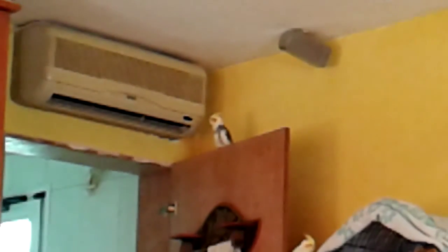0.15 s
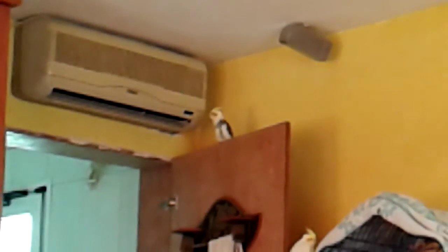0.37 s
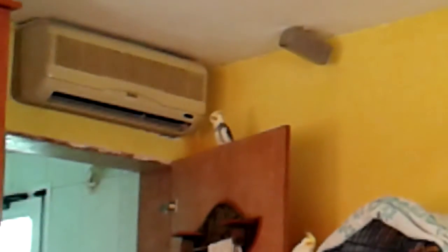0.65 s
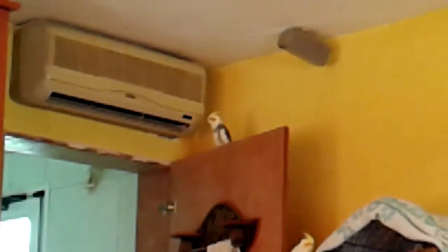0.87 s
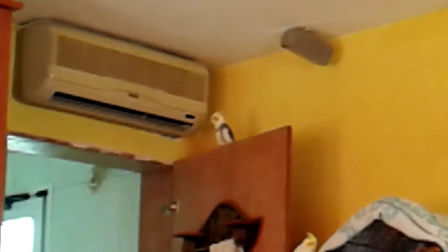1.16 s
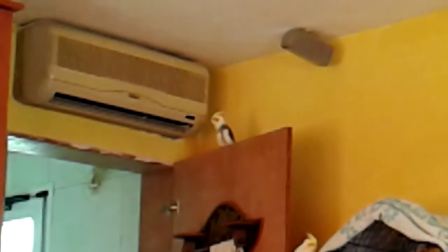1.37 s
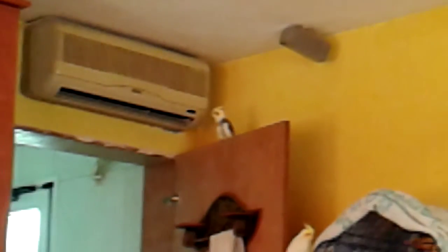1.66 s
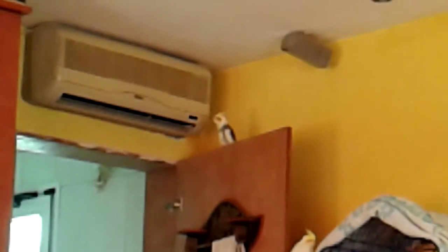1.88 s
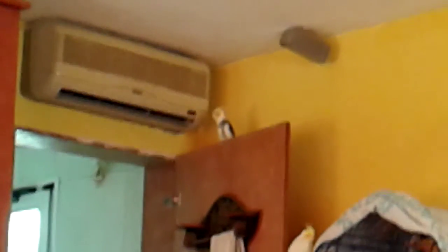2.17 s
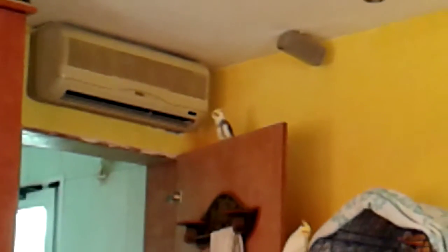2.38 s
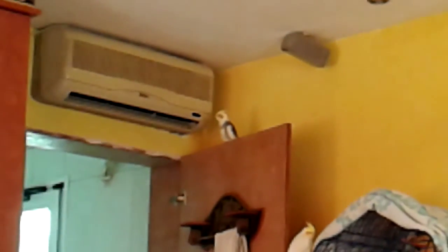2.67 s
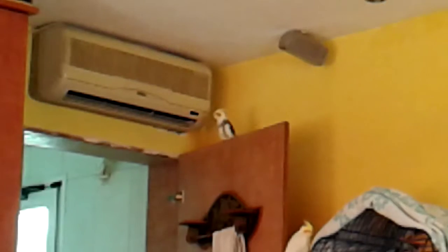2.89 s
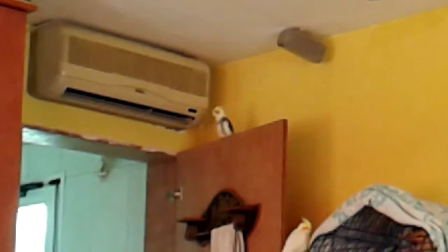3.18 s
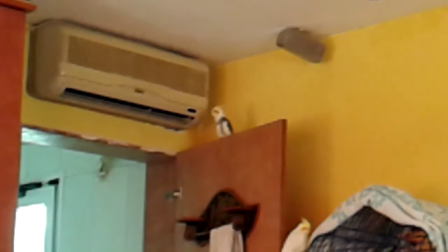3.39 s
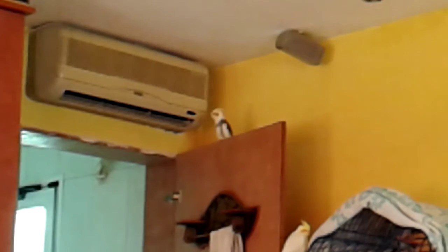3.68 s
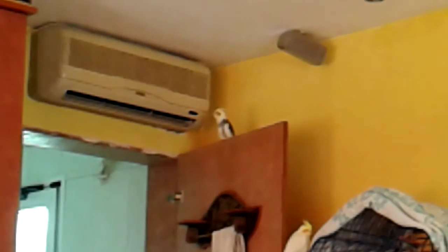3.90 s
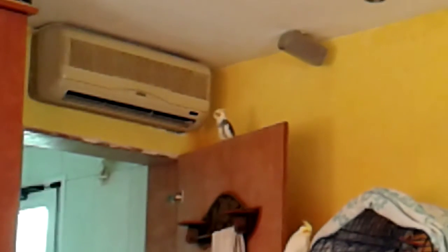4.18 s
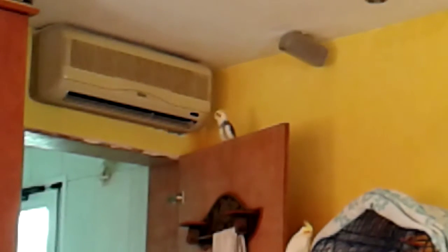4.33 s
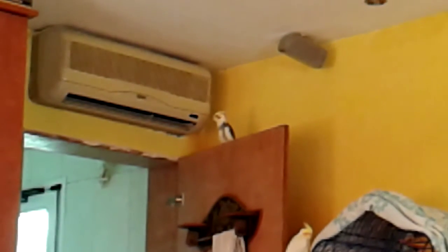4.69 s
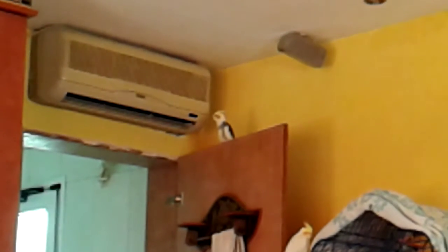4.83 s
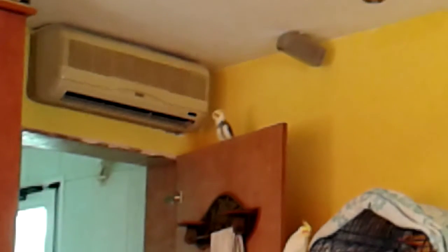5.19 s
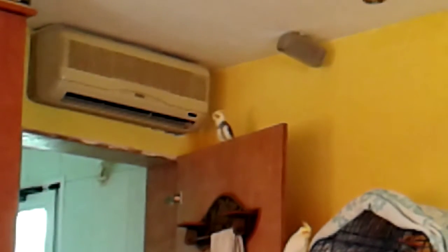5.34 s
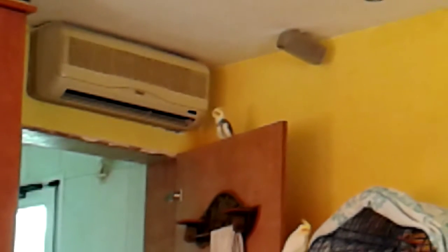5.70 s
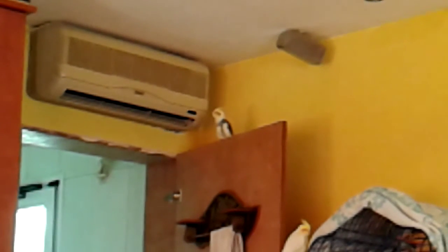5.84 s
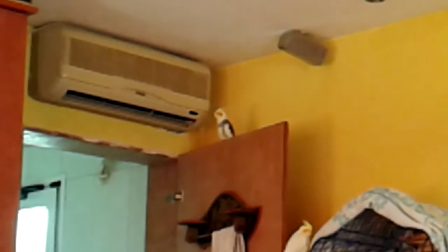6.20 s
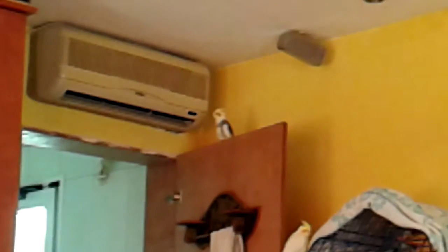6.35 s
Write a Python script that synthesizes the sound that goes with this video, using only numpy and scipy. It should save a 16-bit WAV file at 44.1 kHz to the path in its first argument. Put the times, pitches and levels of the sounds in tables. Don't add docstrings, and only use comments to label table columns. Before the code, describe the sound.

Mono phone pickup in a hard-walled room, cockatiels a few metres away, each note trailed by a short bright reverberation. Near silence first, then at 0.2-0.5 s a scoop rises to a clear whistle near 2.8 kHz and falls. Further scooped calls come at 0.75-1.0, 1.3-1.55 and 1.8 s. The loudest, brightest calls, with squawky onsets, come at 2.1, 2.4-2.6 (peak, ending in a steep fall) and 2.8 s. A weak note at 3.1 and a clear whistle at 3.4 follow. From 3.9 to 4.9 s only low, hoarse, quieter mutters. Softer whistles return at 5.25 and 5.8, with a mutter at 5.6, then thin chirps at 6.1 and 6.45. Hiss and low rumble swell with calls and shrink between. Very faint dog yaps throughout, engine drone around 1-3 s, a thin brake squeal near 3.3; tiny case ticks at 0.7, 1.05, 1.6, 2.35, with dull taps until 2.5.

```python
import sys
import numpy as np
from scipy import signal
from scipy.fft import rfft, irfft, next_fast_len
from scipy.io import wavfile
from scipy.ndimage import uniform_filter1d, map_coordinates

SR = 44100
rng = np.random.default_rng(int(sys.argv[2]) if len(sys.argv) > 2 else 0)


def to_linear_factor(level_db):
    exponent = np.asarray(level_db, float) / 20
    return 10 ** exponent


def store_wav(level_fs):
    pcm = np.round(np.clip(np.atleast_2d(level_fs), -1, 1) * 32767)
    wavfile.write(sys.argv[1], SR, pcm.T.astype(np.int16))


N = 287532
T = np.arange(N) / SR


def unit(x):
    return x / np.sqrt(np.mean(x ** 2) + 1e-20)


def along(points, hz):
    point_hz, value = np.transpose(points)
    return np.interp(np.log(hz + 1), np.log(point_hz + 1), value)


def curve(rows):
    return np.interp(T, *np.transpose(rows))


def wobble(rate, size=N):
    knots = rng.standard_normal(int(size * rate / SR) + 4)
    return map_coordinates(knots, [np.arange(size) * rate / SR])


def filtered(x, response):
    m = next_fast_len(N + SR // 2)
    return irfft(rfft(x, m) * response(np.fft.rfftfreq(m, 1 / SR)), m)[:N]


def span(rows, edge):
    s, *cols = np.transpose(rows)
    at = slice(round(s[0] * SR), min(N, round(s[-1] * SR)))
    window = np.clip(np.minimum(T[at] - s[0], s[-1] - T[at]) / edge, 0, 1)
    return at, [np.interp(T[at], s, c) for c in cols], window


# start_s, widest_s, hiss_let_through_db
OPENINGS = [(0.165, 0.52, -61.5), (0.735, 1.056, -63), (1.231, 1.636, -64), (1.803, 1.902, -61.5),
            (2.07, 2.333, -60.5), (2.4, 2.634, -61), (2.755, 2.983, -63), (3.065, 3.201, -64),
            (3.399, 3.613, -63.5), (3.924, 3.989, -67), (4.104, 4.211, -65), (4.28, 4.403, -66.5),
            (4.593, 4.718, -68.5), (4.741, 4.857, -66), (5.116, 5.394, -65), (5.54, 5.867, -63.5),
            (6.09, 6.163, -62.5), (6.412, 6.533, -65)]


def opening():
    shut_db, closing_db_per_s = -74, 38.5
    early_share = 0.51
    points = [(0, shut_db)]
    for start, widest, db in OPENINGS:
        last_s, last_db = points[-1]
        shut = min(last_s + (last_db - shut_db) / closing_db_per_s, start - .001)
        from_db = last_db - closing_db_per_s * (shut - last_s)
        early = (start + (widest - start) / 3, from_db + early_share * (db - from_db))
        points += [(shut, from_db), (start, from_db), early, (widest, db)]
    return to_linear_factor(curve(points) + 64)


# pitch_hz, t60_s
ROOM_DECAY = [(500, 0.29), (1500, 0.44), (2700, 0.28), (5000, 0.38), (9000, 0.14)]


def room(x, onset):
    hz, t, z = signal.stft(rng.standard_normal(SR * 3 // 4), SR, nperseg=256)
    decay = to_linear_factor(-60 * t / along(ROOM_DECAY, hz)[:, None])
    tail = signal.istft(z * decay, SR, nperseg=256)[1]
    tail = tail * (1 - np.exp(-np.arange(len(tail)) / SR / onset))
    return signal.fftconvolve(x, tail / np.linalg.norm(tail))


# frequency_hz, level_db_per_hz
AIR_SPECTRUM = [(12, -34), (20, -2), (54, 2.5), (205, -2.5), (302, -10.5), (433, -17), (587, -18.5),
                (693, -20), (774, -19), (1110, -24.5), (1550, -24), (2280, -22), (2480, -25.5),
                (2770, -24.5), (15000, -29.5)]
# time_s, level_db
RUMBLE_SWELL = [(0, -2.5), (1.7, 5), (1.9, 9), (2.5, 0), (3.5, 3.5), (4, -3.5), (4.7, 4), (5.4, 8),
                (5.9, 2.5), (6.52, 5)]


def air():
    bed = unit(filtered(rng.standard_normal(N), lambda hz: to_linear_factor(along(AIR_SPECTRUM, hz))))
    low = filtered(bed, lambda hz: 1 / (1 + (hz / 330) ** 4))
    swell_db = curve(RUMBLE_SWELL) - 12 + 1.7 * wobble(10)
    return to_linear_factor(-49) * (bed - low + low * to_linear_factor(swell_db))


def far_notes(rows, fall, shake):
    out = np.zeros(N)
    for start, length, hz, db in rows:
        u = np.arange(round(length * SR)) / SR / length
        pitch = hz * (1 + fall * (.5 - u) + shake * wobble(31, size=SR)[:len(u)])
        tone = np.sin(2 * np.pi * np.cumsum(pitch) / SR)
        out[round(start * SR):][:len(u)] += to_linear_factor(db + 4) * np.sin(np.pi * u) ** 0.65 * tone
    return out


# start_s, length_s, pitch_hz, level_db
ENGINE = [
    (1.048, .62, 68.7, -55.5),
    (1.818, 0.32, 71.85, -56.5),
    (2.172, .78, 69.5, -57.5),
    (5.06, 0.26, 70.9, -75),
]


def engine():
    out = np.zeros(N)
    for start, length, pitch, level in ENGINE:
        at, (hz, db), window = span([(start, pitch, level), (start + length, pitch, level)], edge=0.074)
        hz = hz * (1 + .015 * wobble(4, size=SR)[:len(hz)])
        out[at] += to_linear_factor(db - 2.0) * window * np.sin(2 * np.pi * np.cumsum(hz) / SR)
    return out


# start_s, length_s, pitch_hz, level_db
YAPS = [(.55, 0.055, 590, -60), (.8, 0.062, 593, -56.5), (1.44, 0.064, 444, -62), (1.47, 0.12, 569, -63),
        (1.62, 0.036, 775, -60), (1.88, 0.042, 594, -60.5), (2.12, 0.065, 606, -57), (2.5, 0.053, 593, -62),
        (3.19, 0.048, 634, -63), (3.19, 0.053, 373, -62), (3.26, 0.043, 542, -63.5),
        (4.04, 0.065, 553, -67), (4.15, 0.069, 584, -64), (4.42, 0.0624, 601, -59.5),
        (4.81, 0.075, 607, -64), (4.93, 0.079, 532, -69.5), (5.15, 0.056, 600, -62), (5.6, 0.037, 730, -63),
        (5.85, 0.04, 604, -56.5), (6.18, 0.067, 624, -56)]
# start_s, length_s, pitch_hz, level_db
SQUEALS = [
    (.09, .2, 2479, -79),
    (.19, .09, 5005, -74),
    (.62, .12, 1770, -74),
    (3.15, .27, 2478, -76),
    (3.29, .14, 1952, -57),
    (3.8, .12, 1952, -80),
    (4.93, .16, 1772, -78),
]


def outside():
    out = far_notes(YAPS, fall=0.11, shake=0.029)
    out += far_notes(SQUEALS, fall=0.00086, shake=0.00088)
    out += engine()
    return (out + to_linear_factor(-12.5) * room(out, onset=0.018)[:N]) / opening()


# time_s, peak_db
TICKS = [
    (0.7188, -31),
    (1.0575, -36),
    (1.6307, -24),
    (2.3431, -25),
]
# time_s, peak_db
TAPS = [
    (1.054, -33.5),
    (1.908, -37),
    (2.544, -44),
]
# frequency_hz, width_hz, level_db
CASE = [(700, 900, -12), (4950, 550, 0), (7300, 700, -10), (9800, 1000, -13), (13800, 1600, -14)]


def case(hz):
    return sum((-1) ** k * to_linear_factor(db) * 1j * hz * width / (centre * centre - hz * hz + 1j * hz * width)
               for k, (centre, width, db) in enumerate(CASE))


def handling():
    blows, pushes, t = np.zeros(N), np.zeros(N), np.arange(600) / SR
    for s, db in TICKS:
        blows[round(s * SR) + np.array([30, 48])] = to_linear_factor(db + 18) * np.array([.7, 1])
    for s, db in TAPS:
        pushes[round(s * SR):][:len(t)] = to_linear_factor(db - 6.5) * (1 - t / 0.00017) * np.exp(-t / 0.0008)
    return (filtered(blows, case) + pushes) / opening()


# start_s, length_s, from_hz, to_hz, effort_db
MUTTERS = [
    (3.922, 0.093, 1386, 1392, -46.5),
    (3.935, 0.1, 2240, 1780, -61),
    (4.158, 0.0424, 1486, 2156, -38),
    (4.326, 0.096, 1314, 1247, -38),
    (4.62, .1, 1451, 1330, -42.5),
    (4.79, 0.061, 1372, 1448, -41.5),
    (4.855, 0.038, 2094, 1790, -57.5),
    (5.6, 0.182, 1327, 1389, -40),
    (5.8, 0.102, 1530, 1467, -46.5),
]


def mutters():
    for rows, overtones_db, hoarse in glides(MUTTERS, (-3.5, -3.5, -9), (-17, -27), hoarse=.47):
        s, hz, db, bright_db = rows[1]
        rows[1] = (s, hz * 1.06, db, bright_db)
        yield rows, overtones_db, hoarse


# start_s, length_s, from_hz, to_hz, effort_db
SQUAWKS = [
    (.828, 0.057, 1594, 1625, -46.5),
    (2.078, 0.048, 1301, 1785, -32.5),
    (2.132, 0.022, 1938, 2033, -28.5),
    (2.418, .021, 1384, 1895, -28),
    (2.439, .014, 1911, 2326, -24),
    (4.138, .02, 1751, 1751, -40),
]


def squawks():
    return glides(SQUAWKS, (-8.5, -8.5, 4.5), (2.5, -4), hoarse=.17)


# start_s, length_s, from_hz, to_hz, effort_db
FALLS = [
    (.456, .05, 2748, 1630, -33.5),
    (2.273, 0.029, 1980, 1910, -43),
    (2.58, .04, 2564, 1396, -26.5),
]


def falls():
    return glides(FALLS, (12.5, 7, -12.5), (-14, -22))


# start_s, length_s, from_hz, to_hz, effort_db
SCOOPS = [(.228, .089, 1580, 2256, -37.5), (.752, 0.08, 1289, 1827, -45), (.825, 0.07, 1958, 1860, -37.5),
          (1.283, 0.051, 1270, 1636, -40), (1.336, .08, 1947, 1621, -39), (1.417, 0.046, 1425, 1484, -46),
          (1.813, 0.034, 1604, 1812, -45), (3.098, 0.0394, 1306, 1567, -43.5),
          (3.418, 0.014, 1865, 2146, -36), (5.222, 0.015, 1380, 1850, -52.5),
          (6.073, 0.046, 1510, 2140, -43.5), (6.437, .048, 1417, 2385, -46)]


def scoops():
    return glides(SCOOPS, (-1, -0.5, 3.5), (-9, -13))


def glides(table, shape_db, overtones_db, hoarse=0):
    for start, length, from_hz, to_hz, db in table:
        rows = [(start + length * u, from_hz + (to_hz - from_hz) * u, db + change_db, 0)
                for u, change_db in zip((0, 1 / 3, 1), shape_db)]
        yield rows, overtones_db, hoarse


# start_s, climb_s, hold_s, top_hz, effort_db
WHISTLES = [(0.317, 0.086, 0.027, 2799, -25.5), (0.884, 0.076, 0.033, 2365, -26.5),
            (1.465, .04, 0.05, 2246, -33), (1.827, 0.049, 0.0083, 2309, -30),
            (2.156, 0.06, 0.047, 2754, -20.5), (2.451, 0.06, 0.071, 2844, -16),
            (2.79, 0.0518, 0.064, 2770, -20), (3.131, 0.024, 0.019, 2040, -43),
            (3.43, .08, 0.012, 2661, -23.5), (5.246, 0.088, 0.035, 2279, -40),
            (5.769, .026, 0.063, 2258, -37), (6.106, 0.059, .006, 2622, -35), (6.482, .04, .03, 2712, -30)]


def whistles():
    start_share, sag_share = .77, 0.0322
    swell_db, fade_db, release_s, release_db = 2.5, 3, 0.015, 24.5
    bright_db, dull_db = 1, 4.5
    u = np.linspace(0, 1, num=8)
    for start, climb, hold, top, db in WHISTLES:
        pitch = top * (start_share + (1 - start_share) * np.sin(np.pi / 2 * u))
        rows = list(zip(start + climb * u, pitch, db - swell_db * (1 - u), bright_db * (1 - u)))
        end, sagged = start + climb + hold, top * (1 - sag_share)
        rows += [(end, sagged, db - fade_db, -dull_db),
                 (end + release_s, sagged, db - fade_db - release_db, -dull_db)]
        yield rows, (-14, -18), 0


# pitch_hz, share_0_to_1
HOARSE = [(1300, .35), (1900, .25), (2300, .12), (2700, .06)]
# frequency_hz, level_db
WINDPIPE = [(1300, -8), (1800, -1.5), (2300, -1.5), (2750, -1), (3600, 1.5), (4600, -2.5), (5500, -2.5),
            (8200, -20.5)]
# frequency_hz, level_db
BEAK = [(4000, -2.5), (5500, -12.5), (7000, -19), (8500, -32), (11000, -34), (16000, -65.5)]


def voice(hz, effort_db, bright_db, overtones_db, hoarse):
    def chance(rate):
        return wobble(rate, size=SR // 3)[:len(hz)]

    levels_db = [effort_db + db + bright_db * (k > 1) + along(WINDPIPE, k * hz)
                 for k, db in enumerate((0, *overtones_db), start=1)]
    rough = hoarse or along(HOARSE, hz)
    flutter = .004 * chance(120) + .04 * rough * chance(30) + .09 * rough * chance(300)
    hz = uniform_filter1d(hz, 200, mode="nearest") * (1 + flutter)
    phase = 2 * np.pi * np.cumsum(hz) / SR
    tone = sum(to_linear_factor(db) * np.sin(k * phase) for k, db in enumerate(levels_db, start=1))
    for k in (4, 5):
        tone += to_linear_factor(levels_db[2] - 3 * (k - 5.0) + along(BEAK, k * hz)) * np.sin(k * phase)
    rasp = 1 + 1.6 * rough ** 2 * chance(1800)
    throb_db = (2 + 6 * rough) * chance(110)
    return tone * rasp * to_linear_factor(throb_db)


# from_s, to_s, level_db
NEARER = [
    (2.05, 2.35, 4),
    (2.4, 2.7, 1),
    (2.78, 3.0, 4),
    (4.12, 4.15, 3),
]


def birds():
    out, gain = np.zeros(N + 2 * SR), opening()
    for kind in (whistles, scoops, squawks, falls, mutters):
        for rows, overtones_db, hoarse in kind():
            at, (hz, effort_db, bright_db), window = span(rows, edge=.002)
            nearer_db = sum(db for start, end, db in NEARER if start <= rows[0][0] < end)
            direct = voice(hz, effort_db, bright_db, overtones_db, hoarse) * window / gain[at]
            wet = room(direct, onset=.002)
            out[at] += to_linear_factor(1 + nearer_db / 2) * direct
            out[at.start:][:len(wet)] += to_linear_factor(3 - nearer_db / 2) * wet
    throat = signal.butter(5, 1200, "high", fs=SR, output="sos")
    return signal.sosfilt(throat, out[:N])


def scene():
    return (birds() + outside() + handling() + air())[None]


def top_cut(x):
    return signal.sosfilt(signal.butter(12, 15950, fs=SR, output="sos"), x)


def record(dry):
    kept = filtered(dry[0] * opening(), lambda hz: (hz < 15140) / (1 + (33 / (hz + 1)) ** 6))
    return top_cut(kept[None])


dry = scene()
out = record(dry)
store_wav(out)
```